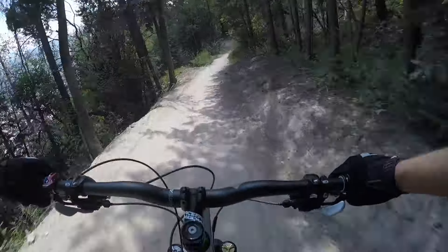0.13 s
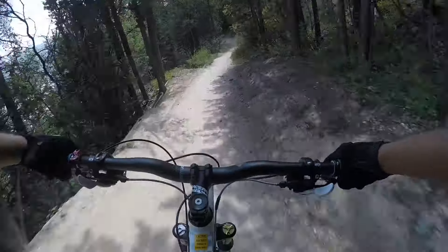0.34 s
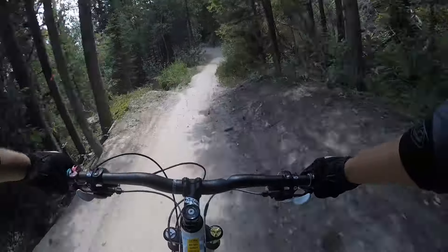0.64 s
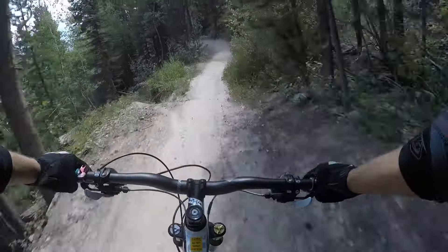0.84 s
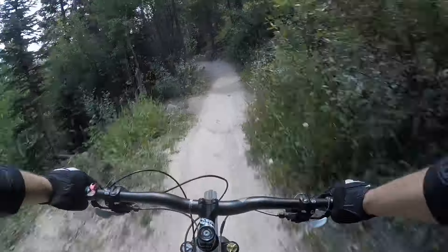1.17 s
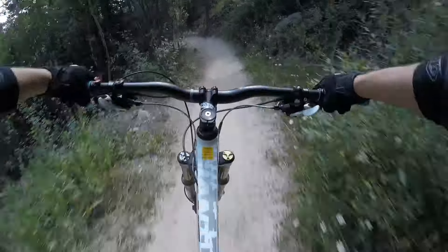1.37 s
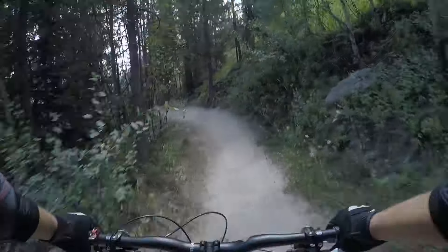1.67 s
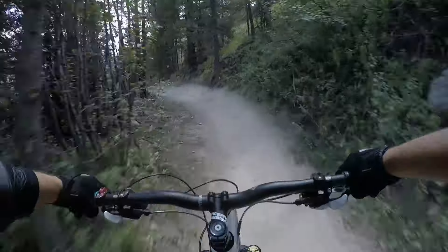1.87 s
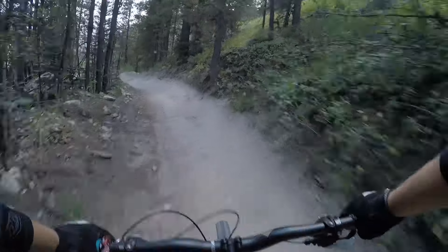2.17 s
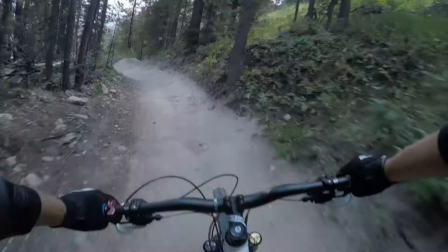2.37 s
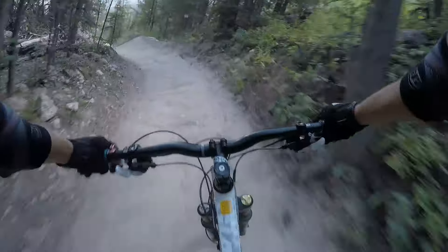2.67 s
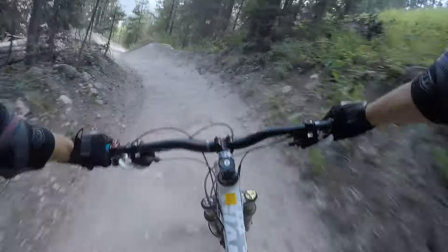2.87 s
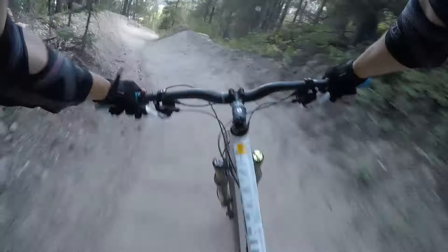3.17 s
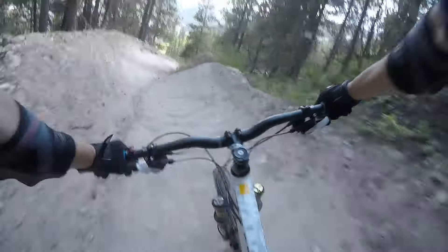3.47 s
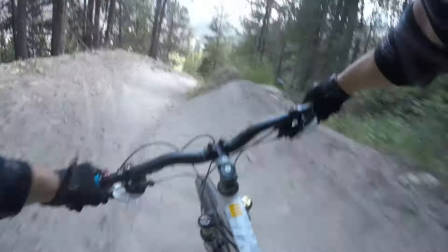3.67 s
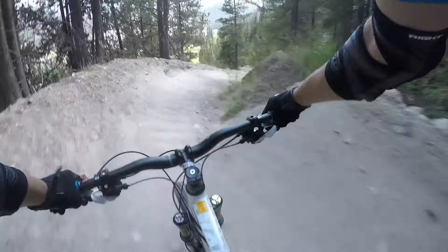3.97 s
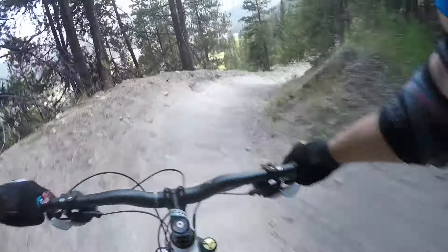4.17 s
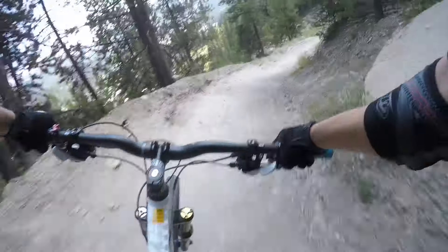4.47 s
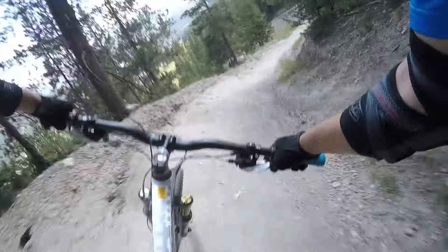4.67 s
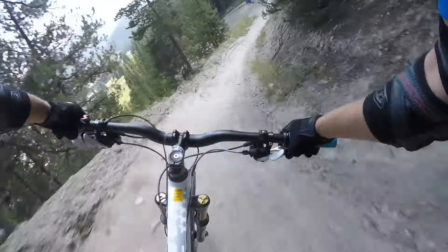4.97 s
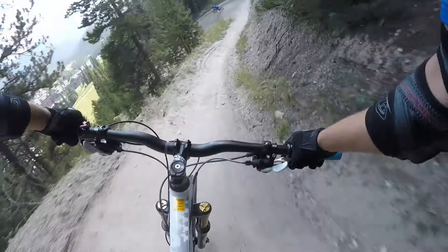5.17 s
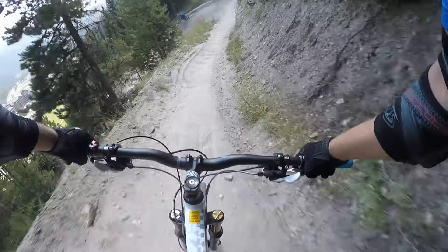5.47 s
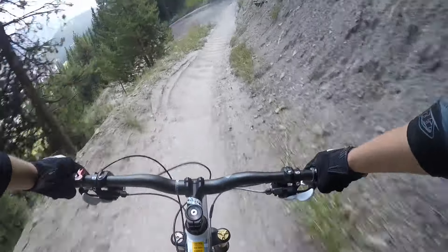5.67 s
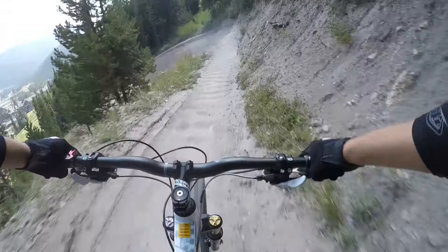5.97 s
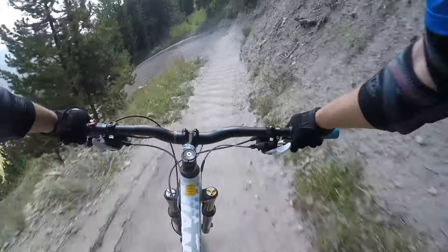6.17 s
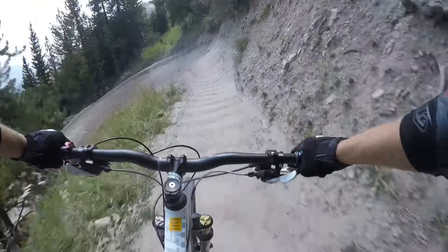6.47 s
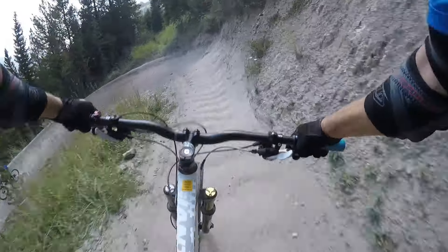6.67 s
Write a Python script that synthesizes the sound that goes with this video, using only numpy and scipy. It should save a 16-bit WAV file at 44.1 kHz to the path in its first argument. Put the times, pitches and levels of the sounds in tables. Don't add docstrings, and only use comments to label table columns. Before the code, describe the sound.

Close, muffled, boomy sound from a chest-mounted microphone outdoors on a bike descent. Tyres hiss, grind and briefly scrape over dirt while low shaking pumps underneath. Plastic mount knocks and cable ticks scatter throughout. Two landings come early, the second harsh and distorted; a calmer roll follows, then rough ground with dense chain slaps, a sharp stone hit on the tube, and a final burst of quick, even chain rattling.

```python
import sys
import numpy as np
from scipy import signal
from scipy.fft import rfft, irfft, next_fast_len
from scipy.io import wavfile
from scipy.ndimage import uniform_filter1d, map_coordinates

SR = 44100
rng = np.random.default_rng(int(sys.argv[2]) if len(sys.argv) > 2 else 0)


def invert_db(level):
    return 10 ** (np.asarray(level, dtype=float) / 20)


def log_audio(samples):
    frames = np.atleast_2d(samples).T
    limited = np.clip(frames, -1, 1)
    pcm = np.round(limited * 32767).astype(np.int16)
    wavfile.write(sys.argv[1], SR, pcm)


N = 300762

# t/s, load/dB, looseness/dB, skid/dB, hollowness/dB
GROUND = [(0.0, -47.5, 1, -8, 0.5), (0.4, -49.5, 0, 1, 5), (1.1, -48.5, 0.5, -1.5, 1),
          (1.28, -43.5, -1, 7.5, 4), (1.44, -53.5, 4.5, 0, 2), (1.79, -45, 1, 6.5, 0),
          (1.94, -57.5, 3, 5, -6), (2.25, -54.5, 1, 2.5, -1), (2.64, -47, 0, 6, 2.5),
          (2.79, -38.5, -1, -2.5, 6.5), (2.89, -43.5, 0, 5, -5), (3.28, -43, 1, 0.5, 0),
          (4.1, -48.5, 0, 2.5, 1.5), (5.07, -46.5, 2, 3.5, -2.5), (5.35, -48.5, 0, -4, 4),
          (6.15, -48, -0.5, 5.5, 5), (6.54, -38, -2, -1.5, 1.5), (6.82, -43, 3.5, -1, 4)]
MIDDLE_LOAD_DB = -47
GRIT_UNDER_DB, SCRAPE_UNDER_DB = 14.5, 8.5

# t/s, peak level/dB, length/s
BUMPS = [(0.017, -16, 0.15), (0.46, -24.5, 0.2), (0.687, -25, 0.049), (0.86, -20, 0.17),
         (1.201, -11.5, 0.051), (1.367, -17, 0.19), (1.648, -17, 0.17), (2.354, -21.5, 0.11),
         (2.728, -6.5, 0.048), (2.826, -9, 0.078), (2.941, -14.5, 0.044), (3.022, -13, 0.025),
         (2.613, -35, 0.021), (3.14, -7.5, 0.035), (3.263, -10.5, 0.12), (3.507, -15, 0.082),
         (3.689, -11.5, 0.11), (3.893, -21, 0.09), (4.149, -11, 0.078), (4.27, -18.5, 0.046),
         (4.467, -23.5, 0.24), (4.581, -9.5, 0.048), (4.73, -8.5, 0.067), (4.863, -15.5, 0.039),
         (4.978, -8.5, 0.026), (5.017, -9.5, 0.033), (5.108, -17.5, 0.09), (5.237, -14.5, 0.06),
         (5.558, -15.5, 0.078), (5.73, -18.5, 0.22), (5.991, -13, 0.053), (6.37, -11.5, 0.074),
         (6.436, -10, 0.04), (6.496, -11.5, 0.042), (6.278, -17.5, 0.06), (6.58, -8, 0.027),
         (6.773, -9.5, 0.15)]
# f/Hz, density/dB
SWAY_SPECTRUM = [(4.7, -19), (11, 1), (23, 5.5), (32, 0), (46, -7.5), (86, -29.5), (110, -45), (140, -50),
                 (240, -120)]
# f/Hz, density/dB
DRUM_SPECTRUM = [(41, -37), (70, -1.5), (303, -25), (900, -35.5), (1170, -52), (1980, -120)]
CALM_DB, CALM_DB_PER_LOAD_DB = -23.5, 2
DRUM_DB, DRUM_DB_PER_LOAD_DB, DRUM_DB_PER_BUMP_DB = -48.5, 0.59, 0.24

# f/Hz, density/dB
HISS_SPECTRUM = [(880, -13), (1500, -6.5), (1950, -8.5), (2250, 2), (2470, 2.5), (2840, -3.5), (3080, -2.5),
                 (3640, 0), (4070, -21), (4410, -19.5), (4790, -17.5), (6000, -28), (7800, -58),
                 (13200, -120)]
# f/Hz, density/dB
GRIT_SPECTRUM = [(2350, -28), (4000, 1.5), (4380, -4), (5990, -7.5), (7640, -6), (9060, -14), (9870, -11),
                 (13300, -11.5), (14500, -16), (15600, -11.5)]
# f/Hz, density/dB
SCRAPE_SPECTRUM = [(210, -52), (350, -6.5), (676, -3.5), (773, -2.5), (848, -4), (1480, 0.5), (1900, -3.5),
                   (2470, -1), (4180, -120)]
# middle t/s, length/s, extra scrape level/dB
SKIDS = [(1.147, 0.054, 11), (1.705, 0.055, 7.5), (1.754, 0.064, 10.5), (2.783, 0.075, 6.5),
         (3.062, 0.042, 8.5), (3.224, 0.05, 9.5), (3.286, 0.053, 11), (4, 0.039, 8), (4.68, 0.038, 14),
         (5.04, .05, 4), (5.21, 0.013, 6), (6.45, 0.035, 4.5)]

# t/s, peak level/dB, f/Hz
PINGS = [(0.013, -27.5, 3300), (0.0383, -31, 3110), (0.0787, -42, 2330), (0.2568, -29, 3150),
         (0.441, -36, 3030), (0.692, -33, 2300), (0.8979, -22, 2270), (0.903, -25, 3370),
         (0.9265, -32, 3590), (1.2111, -29, 2270), (1.2805, -37, 2170), (1.3907, -30, 2330),
         (1.688, -20, 2720), (1.702, -25, 2300), (1.711, -20, 2270), (1.723, -28, 2520), (2.665, -25, 2600),
         (2.7305, -31, 2500), (2.82, -23, 2920), (2.899, -28, 3160), (2.9304, -30, 2180),
         (2.995, -20, 3170), (3.0189, -33, 3010), (3.1057, -38, 2530), (3.1286, -39, 2200),
         (3.1436, -23, 2260), (3.2, -23, 2220), (3.2766, -21, 3100), (3.2938, -18, 2350),
         (3.297, -18, 3280), (3.341, -30, 2300), (3.392, -26, 3060), (3.421, -25, 3130),
         (3.492, -26.5, 2500), (3.558, -27, 3070), (3.6914, -26.5, 3600), (3.7435, -27, 2420),
         (3.8505, -24, 2440), (4.076, -31, 3600), (4.1174, -30, 2280), (4.2401, -24, 2300),
         (4.4192, -27.5, 2150), (4.445, -35, 2200), (4.8188, -32, 2330), (4.8406, -43.5, 3180),
         (4.9224, -36, 2320), (5.2701, -34, 2370), (5.474, -45, 3610), (5.61, -30, 2330),
         (5.6357, -33, 2330), (5.7295, -31, 2390), (5.7465, -29, 2300), (6.0373, -34.5, 2570),
         (6.1145, -31, 2390), (6.1476, -29, 3560), (6.1846, -27.5, 2000), (6.3197, -28, 3400),
         (6.3726, -27, 2330), (6.6674, -19.5, 3140), (6.7483, -21, 3420)]
PING_DB, PING_T60_S, PING_RISE_S, PING_CHATTER_DB = -2, 0.031, 0.0019, 4

# t/s, peak level/dB, f/Hz
TICKS = [(0.045, -25, 2020), (1.228, -10, 2080), (1.3212, -16, 1420), (1.358, -21, 2040),
         (1.7027, -24, 1960), (1.749, -22.5, 2330), (1.7891, -5, 2200), (1.8393, -14.5, 2080),
         (1.897, -19, 1900), (1.964, -28.5, 1780), (2.7523, -17, 2070), (2.839, -13.5, 1910),
         (3.037, -17.5, 1830), (3.1571, -16, 2080), (3.1972, -27, 2340), (3.223, -19.5, 1640),
         (3.267, -11.5, 2110), (3.3008, -18.5, 1760), (3.3676, -14, 2330), (3.454, -18.5, 2550),
         (3.8342, -20, 2260), (4.2886, -22.5, 1430), (4.523, -19.5, 1900), (4.633, -17.5, 1630),
         (4.703, 2.5, 2010), (4.7792, -18, 1950), (5.0435, -16.5, 1720), (5.069, -24, 1300),
         (5.3356, -29.5, 1370), (6.455, -17, 1900), (2.8774, -25, 2080), (0.786, -33, 1710),
         (3.7926, -27, 1600), (4.184, -32, 1500), (5.208, -28.5, 1470), (6.806, -21.5, 1600),
         (2.768, -20.5, 2930), (3.873, -39, 2100), (4.009, -30, 1640), (6.319, -24, 1520),
         (6.768, -27, 1400), (1.843, -26, 1700)]
# t/s, f/Hz
STRAYS = [(0.8122, 1510), (0.852, 2310), (0.898, 2370), (1.117, 1330), (1.259, 1340), (1.428, 1630),
          (2.024, 1700), (2.5372, 2280), (2.7087, 2330), (3.415, 2000), (3.5704, 1570), (3.604, 2300),
          (3.6391, 2300), (3.669, 2230), (3.906, 1550), (3.951, 2220), (4.476, 1390), (4.5557, 2330),
          (4.6668, 2000), (5.886, 2170), (6.3454, 2330), (6.54, 2330), (6.6137, 2340)]
STRAY_DB, STRAY_DB_PER_LOAD_DB = -27, 0.7

# t/s, links level/dB, stay level/dB
TOUCHES = [(0.078, -44, -24.5), (0.247, -30, -23), (1.209, -33, -25.5), (1.3886, -28.5, -32),
           (1.645, -42, -25.5), (1.7449, -30, -45), (2.509, -29, -42), (2.571, -30, -35), (2.967, -30, -26),
           (3.1055, -24.5, -36), (3.691, -33, -22.5), (3.848, -27, -21), (4.0465, -33, -26),
           (4.077, -28.5, -25.5), (4.117, -32, -22.5), (4.1769, -33, -48), (4.2395, -33, -28.5),
           (4.5565, -28.5, -23), (4.762, -32, -25), (4.797, -34, -27), (4.819, -32, -27.5),
           (4.839, -28, -25.5), (4.98, -27, -29), (5.0667, -29.5, -20.5), (5.1422, -32, -21),
           (5.7443, -27.5, -40), (5.885, -30.5, -34), (6.2445, -29, -35)]
# t/s, peak level/dB
SLAPS = [(0.8986, -23.5), (1.692, -23.5), (1.7853, -16), (1.8846, -24), (2.7057, -22), (2.7681, -17.5),
         (2.8973, -24.5), (2.9432, -24), (3.0278, -25), (3.2021, -25), (3.275, -15), (3.3036, -15),
         (3.3564, -19), (3.394, -24), (3.4865, -28), (3.5176, -26), (3.5379, -27.5), (3.7663, -28),
         (3.9764, -27), (4.3907, -29.5), (4.7004, -21.5), (5.186, -27), (6.1448, -25), (6.341, -19.5),
         (6.418, -20), (6.4455, -19.5), (6.4956, -18), (6.5196, -23), (6.539, -15.5), (2.73, -27),
         (2.751, -31), (2.829, -26), (2.918, -27), (2.995, -29), (3.039, -25), (3.076, -32), (3.128, -38),
         (3.267, -20.5), (3.2975, -17.5), (3.421, -29), (3.667, -30), (4.276, -35), (4.418, -34),
         (5.047, -29), (5.203, -33), (5.27, -33), (5.474, -32.5), (5.626, -34), (6.322, -27), (6.4705, -19),
         (6.586, -24), (6.715, -33), (6.763, -25.5), (6.748, -26), (6.63, -37), (6.438, -26),
         (6.808, -23.5)]
# t/s, peak level/dB
BLOWS = [(0.8999, -27), (1.2283, -29), (1.356, -26), (1.693, -13.5), (1.787, -15), (1.929, -22),
         (2.672, -22), (2.704, -16), (2.7664, -15.5), (2.826, -16), (2.867, -18), (3.038, -18.5),
         (3.268, -18), (3.3055, -8.5), (3.356, -13.5), (6.518, -22), (6.564, -19), (2.785, -29),
         (3.06, -23), (3.518, -22.5), (3.766, -15.5), (4.631, -19), (4.7, -10.5), (5.023, -17),
         (5.187, -20), (6.148, -23), (6.2676, -20.5), (6.342, -12), (6.419, -15.5), (6.439, -16),
         (6.47, -13), (6.4956, -3.5), (6.539, -8)]
WASHBOARD_S, RIPPLE_S, RIPPLES = 6.62, 0.0398, 5
WASHBOARD_LINKS_DB, WASHBOARD_STAY_DB = -22.5, -17
# f/Hz, width/Hz, level/dB
LINK_MODES = [(4720, 280, 2), (5590, 220, 5), (6630, 380, -2.5), (7200, 77, 2.5), (7700, 160, -1.5),
              (8820, 320, -7), (9890, 320, 1), (11870, 120, -6), (13100, 49, -15)]
# f/Hz, density/dB
LINK_FIZZ_SPECTRUM = [(2240, 6.5), (3800, 7.5), (4180, -7), (5570, -10), (6050, -6), (10100, -13.5),
                      (13700, -17), (15600, -37)]
# f/Hz, width/Hz, level/dB
STAY_MODES = [(2330, 346, -9.5), (3140, 119, -4.5), (3640, 126, -9.5)]
STRIKE_DB, STRIKE_DB_PER_DB = 3, 1.3
STRIKE_T60_S, STRIKE_RISE_S = 0.02, 0.0022
RATTLE_DB = 1.7

# middle t/s, peak level/dB, f/Hz
THUDS = [(0.263, -40, 91), (0.373, -40, 90), (0.477, -26, 101), (0.791, -27.5, 84.5), (1.284, -21, 146),
         (1.404, -30, 91), (2.351, -28, 80), (2.689, -29, 117), (2.758, -29, 110), (2.803, -23.5, 127),
         (2.861, -25, 121), (3.075, -28.5, 138), (3.248, -31, 122), (3.594, -28, 120), (3.786, -28.5, 89),
         (4.456, -24, 82.5), (4.582, -24.5, 84.4), (4.943, -32.5, 91), (5.014, -28.5, 100),
         (5.278, -27.5, 95), (5.751, -27, 105), (5.861, -27, 101), (5.926, -37, 100), (6.341, -41, 101),
         (6.421, -29, 90), (6.486, -33, 95), (4.95, -32.5, 190), (5.28, -41, 200), (1.278, -21, 200)]
THUD_CYCLES, THUD_OVERTONE_RATIO, THUD_OVERTONE_DB = 2.42, 1.62, -18.5

# t/s, peak level/dB, f/Hz, hollow part/dB
KNOCKS = [(0.647, -17.5, 874, -10), (1.145, -25.5, 880, -1), (1.272, -16.5, 930, -6),
          (1.32, -25.5, 1140, -5), (1.687, -24.5, 1100, -8.5), (1.708, -22, 1280, -12),
          (1.742, -15.5, 945, -14), (1.7816, -8.5, 1044, -20), (3.541, -40.5, 810, 4),
          (4.122, -29, 870, -6.5), (4.203, -22, 920, -9.5), (4.684, -26.5, 1120, -4), (4.77, -23, 1060, -9),
          (4.82, -25.5, 914, -16), (4.942, -29.5, 1030, -8), (5.032, -28.5, 1290, -5.5),
          (5.071, -14, 936, -17), (5.127, -27, 1050, -5), (5.441, -26, 910, -13), (5.599, -26, 906, -22),
          (6.2, -17.5, 940, -25), (6.309, -20.5, 930, -21), (6.683, -20.5, 930, -16),
          (6.707, -31, 1130, -12), (6.79, -32.5, 1030, -5), (1.7494, -17.5, 1000, -20),
          (1.7536, -22, 1100, 1.5), (1.717, -27, 790, -18), (1.833, -29, 1110, -18),
          (2.001, -40, 1130, -12), (3.275, -28, 880, -30), (3.709, -36, 950, -19), (3.197, -31.5, 860, -7),
          (4.72, -30, 950, -8), (4.593, -33, 900, -8.5), (1.116, -35, 925, -4), (2.883, -53, 900, 9.5),
          (3.309, -26, 1530, -24), (5.272, -45.5, 1000, 2)]
# f/Hz, level/dB, t60/s, delay/s
PLATE_MODES = [(592, 1, 0.013, 0.0013), (371, -0.5, 0.014, 0.003), (188.6, 1, 0.04, 0.0044),
               (110, 2, 0.05, 0.00608)]

# t/s, peak level/dB, length/s, sign
LANDINGS = [
    (1.283, -8, .010, 1),
    (1.7575, -6, .008, 1),
    (1.7838, 1, .0068, -1),
    (1.7895, 5, .015, 1),
    (4.708, -7, .018, -1),
]
CRACK_S, CRACK_DB, CRACK_T60_S = 1.788, -13, 0.0049
VENT_HZ = 6

# t/s, level/dB
STONE_HITS = [
    (4.7008, -4.5),
    (4.7027, -8),
]
# f/Hz, level/dB, t60/s
TUBE_MODES = [(1880, -16, 0.15), (2000, 8, 0.0037), (2300, -15, 0.085), (2830, 1, 0.015), (3600, -5, 0.012),
              (1250, 6.5, 0.0064), (2550, 2, 0.01), (4370, -5, 0.007), (6700, -13, 0.0062),
              (8300, -14, 0.0045), (11760, -19, 0.0055)]

INPUT_TOP, INPUT_KNEE = 0.96, 8
TOP_HZ, TOP_FALL_HZ = 15150, 130


def unit(x):
    return x / np.sqrt(np.mean(x ** 2) + 1e-20)


def along(points, hz):
    f, v = np.transpose(points)
    return np.interp(np.log(hz + 1), np.log(f + 1), v)


def curves(rows):
    s, *cols = np.transpose(rows)
    return [np.interp(np.arange(N) / SR, s, c) for c in cols]


def wobble(rate_hz):
    knots = rng.standard_normal(int(N * rate_hz / SR) + 4)
    return map_coordinates(knots, [np.arange(N) * rate_hz / SR])


def filtered(x, response):
    m = next_fast_len(N + SR // 2)
    return irfft(rfft(x, m) * response(np.fft.rfftfreq(m, 1 / SR)), m)[:N]


def coloured(x, spectrum):
    return unit(filtered(x, lambda hz: invert_db(along(spectrum, hz))))


def resonances(modes):
    def response(f):
        total = 0
        for k, (centre, width, db) in enumerate(modes):
            damping = 1j * f * width
            total = total + (-1) ** k * invert_db(db) * damping / (centre ** 2 - f * f + damping)
        return total
    return response


def crunch(rate_hz, spread_db, share):
    size = invert_db(spread_db * np.minimum(rng.exponential(size=N), 2))
    size = size * (rng.random(N) < rate_hz / SR)
    grains = unit(size * np.sign(rng.standard_normal(N)))
    share = np.clip(share, 0, 1)
    return np.sqrt(share) * grains + np.sqrt(1 - share) * rng.standard_normal(N)


def add(track, s, sound):
    part = track[round(s * SR):][:len(sound)]
    part += sound[:len(part)]


def ring(hz, t60_s, rise_s):
    t = np.arange(SR // 5) / SR
    return np.sin(2 * np.pi * hz * t) * invert_db(-60 * t / t60_s) * (1 - np.exp(-t / rise_s))


def bursts(events, t60_s, spread, rise_s):
    out = np.zeros(N)
    t = np.arange(SR // 8) / SR
    for (s, db), c in zip(events, rng.standard_normal(len(events))):
        this_t60_s = t60_s * np.exp(spread * c + 0.012 * (db + 29.0))
        add(out, s, invert_db(db - 60 * t / this_t60_s) * (1 - np.exp(-t / rise_s)))
    return out


def ground():
    load_db, loose_db, skid_db, _ = curves(GROUND)
    return load_db, load_db - GRIT_UNDER_DB + loose_db, load_db - SCRAPE_UNDER_DB + skid_db


def bumps():
    load_db, *_, hollow_db = curves(GROUND)
    t = np.arange(N) / SR
    load = load_db - MIDDLE_LOAD_DB
    calm = invert_db(CALM_DB + CALM_DB_PER_LOAD_DB * np.minimum(load, 0))
    swell = sum(invert_db(db) * np.exp(-(2 * (t - s) / length) ** 2 * np.log(2)) for s, db, length in BUMPS)
    sway_db = 20 * np.log10(np.hypot(calm, swell))
    bump_db = sway_db - 20 * np.log10(calm)
    drum_db = DRUM_DB + hollow_db + DRUM_DB_PER_LOAD_DB * np.minimum(load, 2) + DRUM_DB_PER_BUMP_DB * bump_db
    return sway_db, drum_db


def shake():
    sway_db, drum_db = bumps()
    sway = coloured(rng.standard_normal(N), SWAY_SPECTRUM)
    power = uniform_filter1d(uniform_filter1d(sway ** 2, size=2000), size=2000)
    size = np.sqrt(np.abs(power))
    sway = unit(invert_db(1.2 * wobble(16)) * sway / (size + 0.3) ** 0.7)
    stroke = unit(uniform_filter1d(np.abs(np.gradient(sway)), size=200))
    lumps = invert_db(0.27 * wobble(12) + 1.2 * wobble(45) + 2.2 * stroke)
    drum = unit(lumps * coloured(crunch(140, spread_db=6.5, share=0.26), DRUM_SPECTRUM))
    return invert_db(sway_db) * sway + invert_db(drum_db + 4.0) * drum


def tyres():
    hiss_db, grit_db, scrape_db = ground()
    loose = (grit_db + 63.0) / 16
    ripples_db = 0.55 * wobble(21.92) + (1.17 + 3.44 * np.clip(loose, 0, 1)) * wobble(60)

    hiss = coloured(crunch(260, spread_db=6, share=0.068 + 0.48 * loose), HISS_SPECTRUM)
    low = filtered(hiss, lambda hz: 1 / (1 + (hz / 2750) ** 12))
    hiss = invert_db(2.3 * wobble(70)) * low + invert_db(1.7 * wobble(70)) * (hiss - low)

    gravel = crunch(330, spread_db=15, share=0.41 * loose)
    chain_hum = unit(filtered(gravel, resonances(LINK_MODES)))
    grit = unit(coloured(gravel, GRIT_SPECTRUM) + 0.1 * chain_hum)

    scrape = coloured(crunch(250, spread_db=4.5, share=0.2), SCRAPE_SPECTRUM)
    t = np.arange(N) / SR
    slide_db = sum(db * np.exp(-(2 * (t - s) / length) ** 4) for s, length, db in SKIDS)

    out = invert_db(hiss_db + ripples_db) * hiss
    out += invert_db(grit_db + 0.5 + ripples_db + 2.2 * wobble(40)) * grit
    return out + invert_db(scrape_db + slide_db + 1.4 * ripples_db + 1.8 * wobble(35)) * scrape


def pings():
    out = np.zeros(N)
    for s, db, hz in PINGS:
        add(out, s, invert_db(db + PING_DB) * ring(hz, PING_T60_S, PING_RISE_S))
    return out * invert_db(PING_CHATTER_DB * wobble(500))


def strays():
    s, load_db = np.transpose(GROUND)[:2]
    out = []
    for at, hz in STRAYS:
        load = np.interp(at, s, load_db) - MIDDLE_LOAD_DB
        out.append((at, STRAY_DB + STRAY_DB_PER_LOAD_DB * load, hz))
    return out


def ticks():
    out = np.zeros(N)
    events = TICKS + strays()
    chances = np.clip(rng.standard_normal((len(events), 3)), -1.5, 1.5)
    for (s, db, hz), (up, up_db, down_db) in zip(events, chances):
        above_hz = min(hz * (1.67 + 0.36 * up), 3700)
        above = invert_db(-11.5 - 0.12 * db + 4.5 * up_db) * ring(above_hz, 0.0044, 0.0003)
        below = invert_db(-9.5 - 0.059 * (db + 33.0) + 3.2 * down_db) * ring(hz * 0.64, 0.0031, 0.00014)
        add(out, s, invert_db(db + 7.0) * (ring(hz, 0.0049, 0.00075) + above - below))
    return out


def contacts():
    washboard = [(WASHBOARD_S + k * RIPPLE_S, WASHBOARD_LINKS_DB, WASHBOARD_STAY_DB) for k in range(RIPPLES)]
    both = TOUCHES + washboard
    return SLAPS + [(s, db) for s, db, _ in both], BLOWS + [(s, db) for s, _, db in both]


def jingle(modes, rate_hz):
    out = np.zeros(N)
    for hz, width_hz, db in modes:
        at, size = rng.random((2, round(rate_hz * N / SR)))
        taps = np.bincount((at * N).astype(int), invert_db(db + 4.7 * size), N)
        b, a = signal.iirpeak(hz, hz / (1.4 * width_hz), SR)
        out += signal.lfilter(b, a, signal.lfilter(b, a, taps))
    return unit(out)


def chain():
    hiss_db, grit_db, _ = ground()
    slaps, blows = contacts()

    links = unit(filtered(crunch(580, spread_db=12.0, share=0.23), resonances(LINK_MODES)))
    fizz = coloured(crunch(700, spread_db=-2.5, share=0.62), LINK_FIZZ_SPECTRUM)
    noise = invert_db(-13.5) * links + invert_db(-2) * fizz
    rattle = np.zeros(N)
    for centre_hz in (3160, 4800, 7720, 12080):
        band = filtered(noise, lambda hz: np.exp(-(np.log(hz / centre_hz + 1e-3) / 0.2) ** 2))
        rattle += invert_db(1.7 * wobble(35)) * band
    rattle *= bursts(slaps, 0.03, 0.11, 0.0031) * invert_db(4.0 + RATTLE_DB * wobble(150))

    chatter = bursts(blows, 0.037, 0.31, 0.00082) * invert_db(-5.5) * rng.standard_normal(N)
    stay = invert_db(17.0) * filtered(chatter, resonances(STAY_MODES))
    for (s, db), c in zip(blows, rng.standard_normal(len(blows))):
        strike_hz = STAY_MODES[1][0] * (1 + 0.006 * c)
        add(stay, s, invert_db(STRIKE_DB_PER_DB * db + STRIKE_DB) * ring(strike_hz, STRIKE_T60_S, STRIKE_RISE_S))

    small = invert_db(1.43 * (hiss_db + 42.0) - 50.0) * jingle(STAY_MODES, 55)
    small += invert_db(1.7 * (grit_db + 61.5) - 68.5) * jingle(LINK_MODES, 35)
    return rattle + stay + small


def thuds():
    out = np.zeros(N)
    for s, db, hz in THUDS:
        t = np.arange(round(THUD_CYCLES / hz * SR)) / SR
        body = np.sin(2 * np.pi * hz * t)
        body += invert_db(THUD_OVERTONE_DB) * np.sin(2 * np.pi * THUD_OVERTONE_RATIO * hz * t)
        add(out, s - t[-1] / 2, invert_db(db) * np.hanning(len(t)) * body)
    return out


def mount():
    out = np.zeros(N)
    chances = rng.standard_normal((len(KNOCKS), len(PLATE_MODES)))
    for (s, db, hz, hollow_db), chance in zip(KNOCKS, chances):
        click = ring(hz, 0.016, 0.002)
        click -= invert_db(-8.5) * ring(1.42 * hz, 0.011, 0.0017)
        click += invert_db(-15.0) * ring(2.17 * hz, 0.0048, 0.00046)
        add(out, s, invert_db(db + 8.5) * click)
        for (plate_hz, level_db, t60_s, delay_s), c in zip(PLATE_MODES, chance):
            answer = ring(plate_hz * (1 + 0.05 * c), t60_s, 0.0011)
            add(out, s + delay_s, -invert_db(db + hollow_db + level_db + 10.5) * answer)
    return out


def landings():
    out = np.zeros(N)
    for s, db, length_s, sign in LANDINGS:
        add(out, s, np.sign(sign) * invert_db(db) * np.hanning(round(length_s * SR)) ** 0.65)
    t = np.arange(SR // 20) / SR
    snap = uniform_filter1d(rng.standard_normal(len(t)), size=3)
    add(out, CRACK_S, invert_db(CRACK_DB - 60 * t / CRACK_T60_S) * snap)
    return filtered(out, lambda f: -f * f / (VENT_HZ ** 2 - f * f + 1j * f * VENT_HZ * 2.2))


def stone():
    out = np.zeros(N)
    for s, db in STONE_HITS:
        for k, (hz, level_db, t60_s) in enumerate(TUBE_MODES):
            add(out, s, (-1) ** k * invert_db(db + level_db) * ring(hz, t60_s, 0.0014))
    return out


def scene():
    rolling = shake() + tyres()
    contact = pings() + ticks() + chain() + thuds() + mount()
    return (rolling + contact + landings() + stone())[None]


def roll_off(x):
    return signal.sosfilt(signal.butter(12, 15800, fs=SR, output="sos"), x)


def record(dry):
    held = dry[0] / (1 + np.abs(dry[0] / INPUT_TOP) ** INPUT_KNEE) ** (1 / INPUT_KNEE)
    held = filtered(held, lambda hz: invert_db(-np.clip(6 * (hz - TOP_HZ) / TOP_FALL_HZ, 0, 70)))
    return roll_off(held[None])


dry = scene()
out = record(dry)
log_audio(out)
```